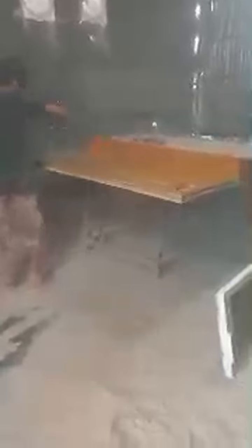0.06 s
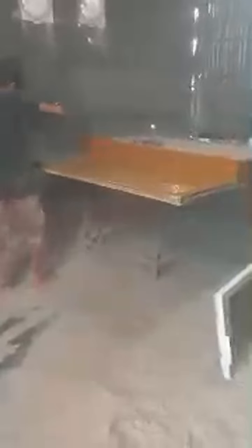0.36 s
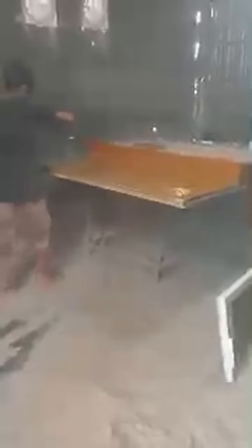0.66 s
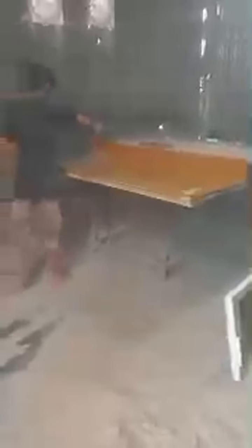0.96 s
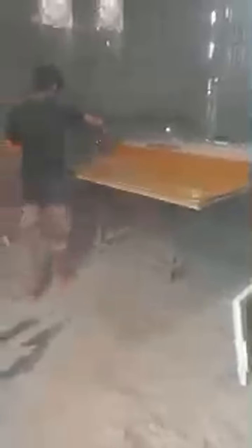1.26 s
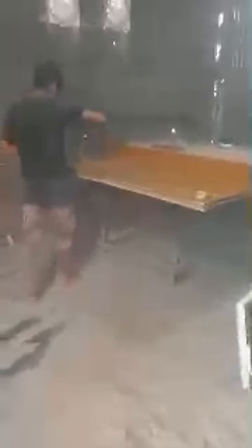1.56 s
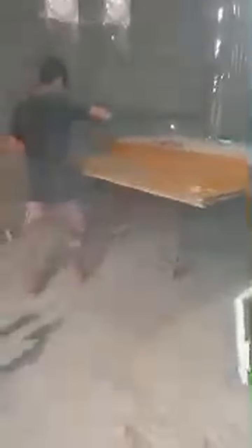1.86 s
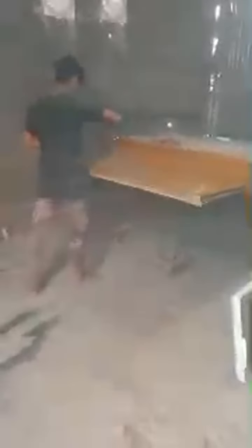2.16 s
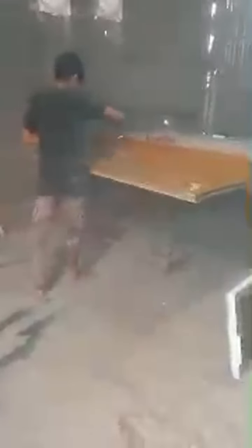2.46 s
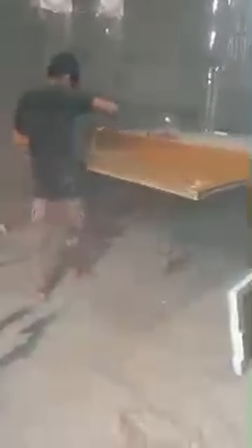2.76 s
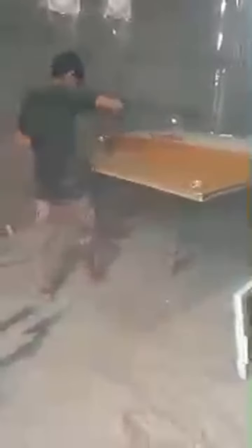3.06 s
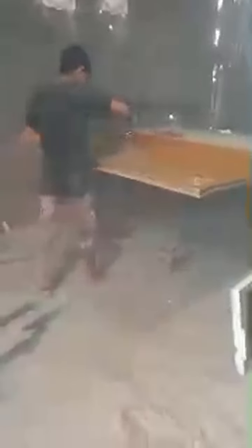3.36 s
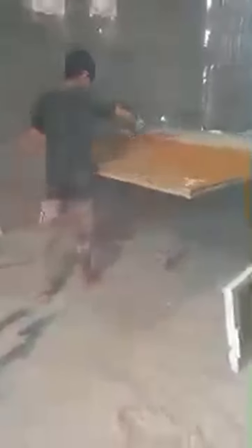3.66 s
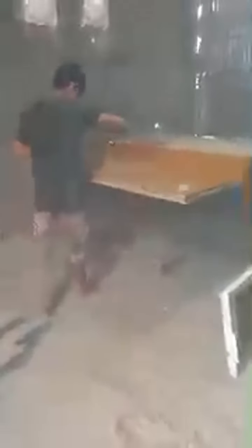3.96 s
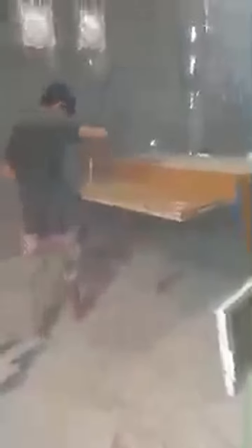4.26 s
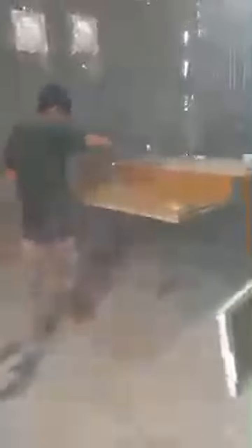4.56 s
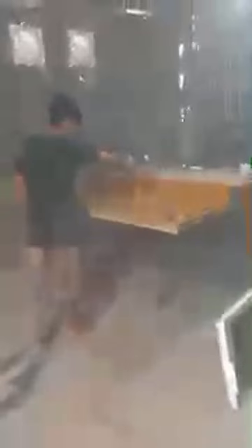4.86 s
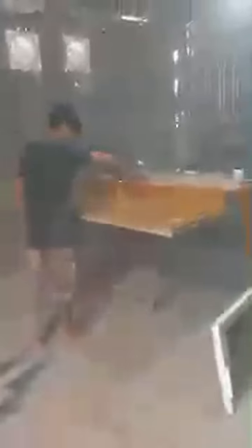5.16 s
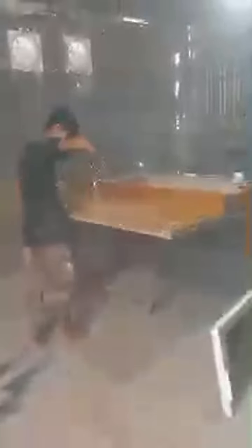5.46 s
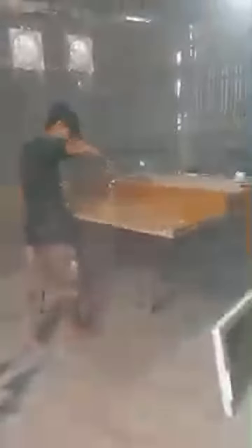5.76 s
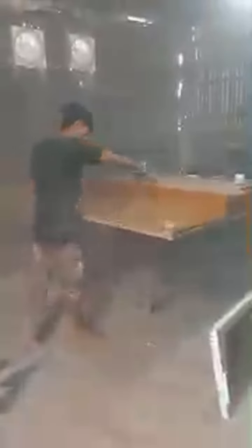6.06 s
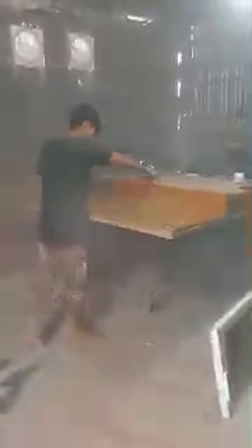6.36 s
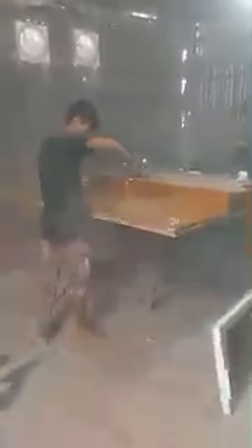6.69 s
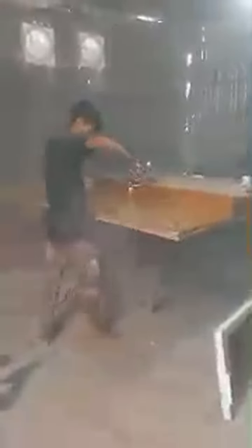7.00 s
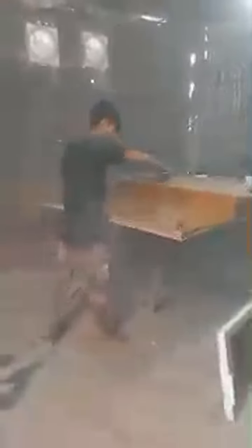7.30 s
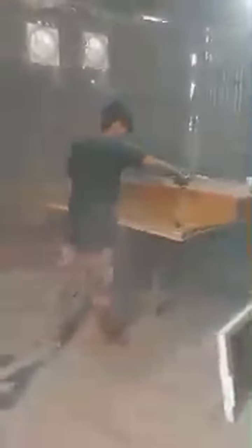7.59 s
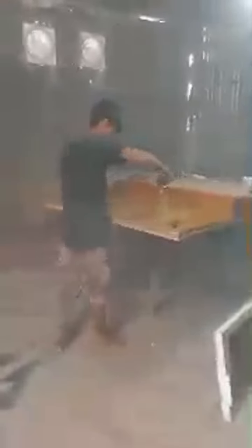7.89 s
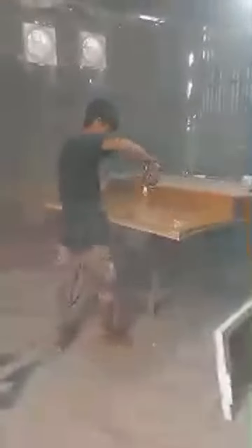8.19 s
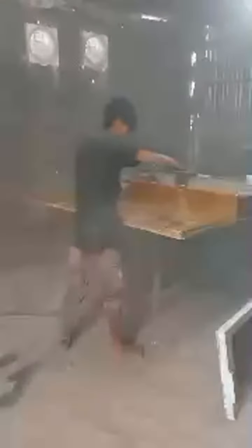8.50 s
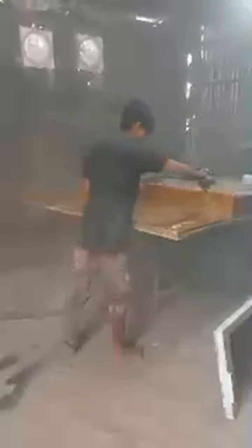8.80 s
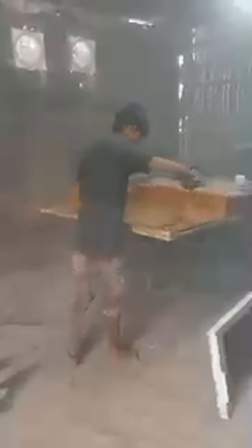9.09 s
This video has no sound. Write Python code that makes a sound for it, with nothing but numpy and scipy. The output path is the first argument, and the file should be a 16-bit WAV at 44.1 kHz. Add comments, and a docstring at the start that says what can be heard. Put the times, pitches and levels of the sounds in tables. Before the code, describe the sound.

A spray gun blows a continuous, whistling hiss of air while a compressor thumps and drones throughout. Quick piston knocks and a pulsing intake rasp echo off hard workshop walls, above a low rush of room noise. The low tone throbs slowly, with brief booms from the housing, mostly around the middle. The single microphone catches a few dry ticks and momentary cutouts, mainly toward the end.

```python
"""An air compressor thumps and drones in a hard-walled workshop while a spray gun hisses at a wooden table.
Its two pumps turn at nearly the same speed, so their shared low tone slowly swells and fades.
The pistons knock, the panels boom, the tank drones and air rasps in through the intake.
The gun's jet of air hisses and makes the hollows of its nozzle and body whistle.
A few times the sound cuts out for an instant or gives a sharp tick."""
import sys
import numpy as np
from scipy import signal
from scipy.fft import rfft, irfft, next_fast_len
from scipy.io import wavfile
from scipy.ndimage import map_coordinates

SR = 44100
rng = np.random.default_rng(int(sys.argv[2]) if len(sys.argv) > 2 else 0)


def waveform_to_disk(signal):
    """Save audio, clipped to [-1, 1], as 16-bit WAV at the path in sys.argv[1]."""
    frames = np.transpose(np.atleast_2d(signal))
    scaled = np.clip(frames, -1, 1) * 32767
    samples = np.round(scaled).astype(np.int16)
    wavfile.write(sys.argv[1], SR, samples)


N = 407484

# The tone colour of the workshop's rush, the air jet and the pump housing.
# Each row: frequency in Hz, relative level in dB.
WORKSHOP_COLOUR = [(20, -25.5), (35, -14), (52, -5), (85, -2.5), (160, 5.5), (400, 2), (1000, 2),
                   (3000, -30), (7600, -42), (8400, -36), (9900, -45.5), (11300, -35), (12500, -42),
                   (16000, -42.5)]
JET_COLOUR = [(500, -21.5), (1500, 1.5), (2200, 9), (2550, 0.5), (3100, 0.5), (4000, -2.5), (4600, -5.5),
              (5000, -8), (5900, -14), (6700, -15), (7700, -28), (8400, -27.5), (9700, -43), (16000, -68.5)]
HOUSING_COLOUR = [(60, -30), (130, -15.5), (175, -10), (215, -14), (272, -7), (320, -5.5), (400, -8.5),
                  (480, -0.5), (560, -1), (660, -1), (820, -2.5), (1000, -7), (1400, -4), (2600, -51.5)]
# The pitches at which each part rings. Each row: pitch in Hz, width in Hz, relative level in dB.
NOZZLE_RINGS = [(1624, 96, -10.5), (1767, 83, -8.5), (1814, 30, -1.5), (1900, 35.5, 0.5), (2010, 117, -12)]
GUN_BODY_RINGS = [(2715, 63, -2), (3422, 78, 2.5), (3626, 190, 0.5), (3810, 150, -6), (4116, 170, -3),
                  (4490, 210, -7)]
PANEL_RINGS = [(271, 14, 1.5), (234.4, 7.4, -7.5)]
TANK_RINGS = [(482.7, 13.5, -3), (527, 12, -2.5), (565.4, 23.5, -1), (625, 16.5, -5)]
INTAKE_RINGS = [(1141, 34, -6.5), (1191, 12.3, -1), (1269, 24, -5), (1314, 30, -1), (1399, 47, -6.5)]
# Slow drifts in the loudness of nozzle and intake. Each row: time in seconds, relative level in dB.
WHISTLE_DRIFT = [(0.0, -27.5), (0.59, -26.5), (0.79, -26.5), (1.31, -26), (1.49, -27.5), (2.29, -26.5),
                 (2.75, -25), (3.5, -26), (5.43, -27), (5.64, -26), (6.97, -28), (7.28, -25.5),
                 (7.57, -28.5), (9.24, -25)]
RASP_DRIFT = [(0.0, -24.5), (0.51, -27.5), (0.79, -26.5), (2.81, -29), (3.19, -25), (3.83, -27),
              (4.14, -25), (4.32, -28), (5.97, -28), (6.43, -26), (6.97, -29.5), (7.26, -27.5), (8.98, -27),
              (9.24, -27.5)]
# The slow pump, then the fast one. Each row: turns per second, time of a first stroke in seconds.
PUMPS = [(6.768, .05), (6.8155, .086)]
# The strong tones of each pump. Each row: multiple of its turning speed, level in dB.
SLOW_PUMP_TONES = [(13, -47), (15, -52.5), (63, -43), (72, -38), (78, -41.5), (79, -39), (82, -43),
                   (84, -42), (85, -38), (87, -38.5), (105, -38.5), (122, -41), (174, -46), (182, -39),
                   (195, -46.5)]
FAST_PUMP_TONES = [(26, -42), (34, -44.5), (40, -44.5), (72, -41.5), (186, -43.5), (194, -42)]
# The low tone both pumps share: multiple of the turning speed, then slow and fast pump's base level in dB.
SHARED_TONE = (28, -39.5, -37.3)
# The panels boom. Each row: middle in seconds, boost in dB.
PANEL_BOOMS = [(1.36, 7), (3.85, 12), (4.01, 9.5), (4.18, 5), (4.37, 8), (5.5, 9), (6.68, 7)]
# The tank swells. Each row: middle in seconds, half length in seconds, boost in dB.
TANK_SWELLS = [(3.603, 0.053, 6), (4.167, 0.15, 7), (7.65, .08, 2), (8.4, 0.35, 2.5)]
# Brief chance peaks in the rasping noise. Each row: time in seconds, rough peak level in dB.
RASP_PEAKS = [(0.3716, -14.5), (6.5425, -14), (6.61, -14), (8.5809, -10.5)]
# The sound cuts out. Each row: start in seconds, end in seconds.
SILENT_GAPS = [(1.559, 1.5645), (8.4203, 8.4235), (9.1385, 9.1425)]
# Sharp, dry ticks. Each row: start in seconds, level in dB.
DRY_TICKS = [(1.585, -14), (8.4443, -17), (9.1413, -17.5), (9.2028, -12.5)]

IN_STEP_S = .51  # a moment when the pumps' shared tones line up
PANEL_DB, TANK_DB, INTAKE_DB = -39, -29.5, -27  # usual levels in the compressor
WHISTLE_DB, JET_DB, BODY_DB = -24.5, -37, -41  # usual levels in the gun
PEAK_RISE_S, PEAK_AVERAGE_DB = .005, -8  # a rasp peak's rise time, and its average level against its top
GAP_FADE_S, TOP_HZ = .00012, 15800


def amp(db):
    """Turn decibels into a volume factor."""
    return 10 ** (np.asarray(db) / 20)


def unit(x):
    """Scale a sound to an average strength (rms) of 1."""
    return x / np.sqrt(np.mean(x ** 2) + 1e-20)


def clock():
    """The time of every sample, in seconds."""
    return np.arange(N) / SR


def wobble(rate):
    """A smooth random curve that heads for a new value rate times a second."""
    return map_coordinates(rng.standard_normal(int(N * rate / SR) + 4), [clock() * rate])


def hump(middle_s, half_s):
    """A smooth rise to 1 and back down."""
    return np.exp(-((clock() - middle_s) / half_s) ** 2)


def cycle(hz, top_s):
    """A steady swing between -1 and 1, highest at top_s."""
    return np.cos(2 * np.pi * hz * (clock() - top_s))


def drift_db(rows):
    """How far a drifting level lies above or below its own average."""
    level = np.interp(clock(), *np.transpose(rows))
    return level - level.mean()


def filtered(x, response):
    """Turn each frequency up or down by the factor response(hz)."""
    size = next_fast_len(N + SR // 2)
    return irfft(rfft(x, size) * response(np.fft.rfftfreq(size, 1 / SR)), size)[:N]


def coloured(x, colour):
    """Give a sound the tone colour in a table, at strength 1."""
    freqs, db = np.transpose(colour)
    return unit(filtered(x, lambda hz: amp(np.interp(np.log(hz + 1), np.log(freqs), db))))


def blown(rings, surge_db, rate):
    """Swirling air makes a part ring; each pitch surges on its own."""
    out = np.zeros(N)
    for hz, width, db in rings:
        band = filtered(rng.standard_normal(N), lambda f: 1 / (1 + ((f - hz) / width) ** 2))
        out += band * amp(db + surge_db * wobble(rate))
    return unit(out)


def workshop():
    """The steady, low rush of the room."""
    return amp(-32.5) * coloured(rng.standard_normal(N), WORKSHOP_COLOUR)


def wall_echo(echo_s):
    """One knock bounces among the bare walls, fading by 60 dB in echo_s."""
    t = np.arange(SR) / SR
    return rng.standard_normal(SR) * amp(-60 * t / echo_s)


def spray_gun():
    """The trigger stays down: one unsteady flow of air hisses and makes the nozzle and body ring."""
    flow_db = 0.37 * wobble(12)
    whistle_db = WHISTLE_DB + 0.8 * drift_db(WHISTLE_DRIFT) + flow_db + 1.7 * wobble(24)
    whistle = amp(whistle_db) * blown(NOZZLE_RINGS, surge_db=1.5, rate=20)
    turn_db = 0.12 * (clock() - clock().mean())  # the worker slowly turns and stops shielding the jet
    jet = amp(JET_DB + turn_db + flow_db + wobble(22)) * coloured(rng.standard_normal(N), JET_COLOUR)
    body = amp(BODY_DB + turn_db + flow_db) * blown(GUN_BODY_RINGS, surge_db=2.5, rate=26)
    return whistle + jet + body


def strokes(speed, first_s, sound, jitter_s, scatter_db):
    """A running pump repeats a sound once a turn, a little uneven in time and strength."""
    turns = np.arange(-8, 70)
    chance = rng.standard_normal((len(turns), 2))
    times = first_s + turns / speed + jitter_s * chance[:, 0]
    lead = 2 * SR  # room for earlier strokes that still echo at the start
    at = np.round(times * SR + lead).astype(int)
    blows = np.bincount(at, amp(scatter_db * chance[:, 1]), N + lead)
    return signal.fftconvolve(blows, sound)[lead:][:N]


def air_pulses(lag_s):
    """The air pulses twice in each turn of the faster pump."""
    speed, first_s = PUMPS[1]
    return cycle(2 * speed, first_s + lag_s)


def thumps(hz, fade_s, second_db):
    """Each gulp of air into the faster pump is a short, low thump; its second piston is weaker."""
    speed, first_s = PUMPS[1]
    t = np.arange(SR // 4) / SR
    gulp = np.sin(2 * np.pi * hz * t) * (t / fade_s) ** 2 * np.exp(-t / fade_s)
    start = first_s - 2 * fade_s  # so the gulp is loudest on the stroke
    strong = strokes(speed, start, gulp, jitter_s=.0002, scatter_db=1)
    weak = strokes(speed, start + .5 / speed, gulp, jitter_s=.0002, scatter_db=1)
    return unit(strong + amp(second_db) * weak)


def panels():
    """The housing's panels murmur, swelling just after the pumps fall in step, and boom now and then."""
    (slow, _), (fast, _) = PUMPS
    beat = cycle(SHARED_TONE[0] * (fast - slow), top_s=IN_STEP_S + 0.1)
    booms_db = sum(db * hump(middle, half_s=0.058) for middle, db in PANEL_BOOMS)
    level_db = PANEL_DB + 2 * beat + booms_db + 1.2 * wobble(9)
    return amp(level_db) * blown(PANEL_RINGS, surge_db=.5, rate=12)


def throb():
    """The pumps' shared tone swells when they are in step and nearly cancels when they are opposed."""
    multiple, *levels = SHARED_TONE
    t = clock() - IN_STEP_S
    pair = sum(np.sqrt(2) * amp(db) * np.sin(2 * np.pi * multiple * speed * t)
               for (speed, _), db in zip(PUMPS, levels))
    return amp(-0.65 + 2.4 * wobble(18)) * pair  # the load varies a little from stroke to stroke


def tank():
    """The air tank drones, pushed just after every stroke, and swells now and then."""
    swells_db = sum(db * hump(middle, half) for middle, half, db in TANK_SWELLS)
    level_db = TANK_DB + 3 * air_pulses(lag_s=0.041) + swells_db + 1.3 * wobble(16)
    return amp(level_db) * blown(TANK_RINGS, surge_db=2.5, rate=22)


def intake():
    """Air rasps in with every stroke; the noise flutters and has a few brief peaks."""
    level_db = INTAKE_DB + 1.3 * drift_db(RASP_DRIFT) + 1.5 * air_pulses(lag_s=0) + 2.25 * wobble(24)
    peaks = np.zeros(N)
    for time, db in RASP_PEAKS:
        age = np.maximum(clock() - time + PEAK_RISE_S / 2, 0) / PEAK_RISE_S
        peaks += amp(db + PEAK_AVERAGE_DB) * age * np.exp(1 - age)
    return (amp(level_db) + peaks) * blown(INTAKE_RINGS, surge_db=2.0, rate=24)


def hum(phase_drift, waver_db):
    """Each pump hums with wavering tones tied to its turning speed."""
    phases = rng.uniform(0, 2 * np.pi, 256)
    t = clock() - IN_STEP_S
    out = np.zeros(N)
    for (speed, _), tones in zip(PUMPS, (SLOW_PUMP_TONES, FAST_PUMP_TONES)):
        for multiple, db in tones:
            hz = multiple * speed
            waver = np.tanh((hz / 600) ** 2)  # high tones waver most as paths through the room change
            phase = 2 * np.pi * hz * t + phases[multiple] + phase_drift * waver * wobble(6)
            out += amp(db) * unit(amp(waver_db * waver * wobble(7)) * np.sin(phase))
    return out


def clatter(echo_s, jitter_s):
    """Each pump's two pistons knock half a turn apart, each with its own echoes."""
    knocks = sum(strokes(speed, first_s + offset / speed, wall_echo(echo_s), jitter_s, scatter_db=1.5)
                 for speed, first_s in PUMPS for offset in (0, .5))
    return coloured(knocks, HOUSING_COLOUR)


def compressor():
    """Two pumps knock, gulp and hum, and set the panels, tank and intake sounding."""
    knocks = amp(-27) * clatter(echo_s=0.85, jitter_s=.00016)
    gulps = amp(-41) * thumps(hz=104.2, fade_s=0.00682, second_db=-0.5)
    return knocks + gulps + panels() + tank() + intake() + hum(phase_drift=0.61, waver_db=4.5) + throb()


def scene():
    """The compressor and the gun over the rush of the workshop, in one channel."""
    return (workshop() + compressor() + spray_gun())[None]


def record(dry):
    """Add the brief silences and the ticks, then remove the very highest treble."""
    t = clock()
    silent = sum(np.clip(np.minimum(t - start, end - t) / GAP_FADE_S, 0, 1) for start, end in SILENT_GAPS)
    sound = dry[0] * (1 - silent)
    tick = np.exp(-t[:SR // 100] / .00018)  # a sudden jump that falls back at once
    for start, db in DRY_TICKS:
        sound[round(start * SR):][:len(tick)] += amp(db) * tick
    return filtered(sound, lambda hz: hz < TOP_HZ)[None]


dry = scene()
out = record(dry)
waveform_to_disk(out)
```